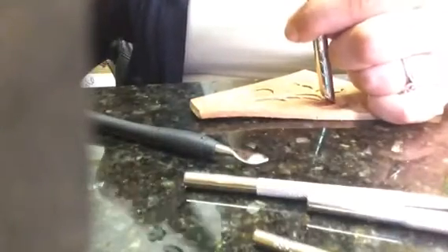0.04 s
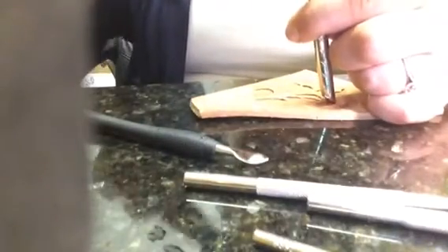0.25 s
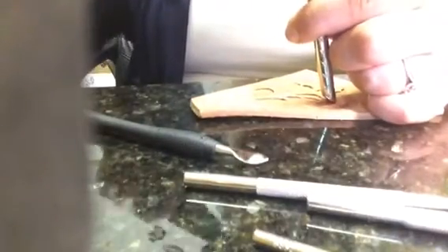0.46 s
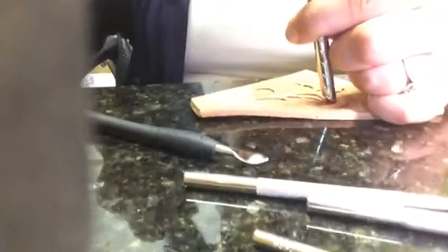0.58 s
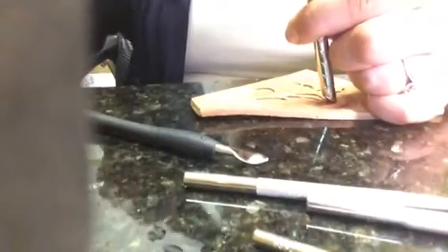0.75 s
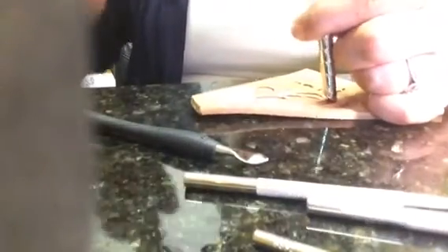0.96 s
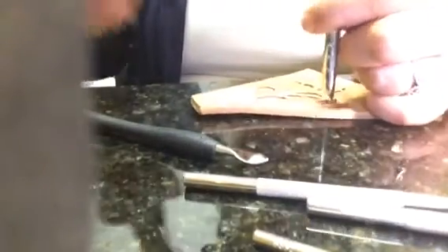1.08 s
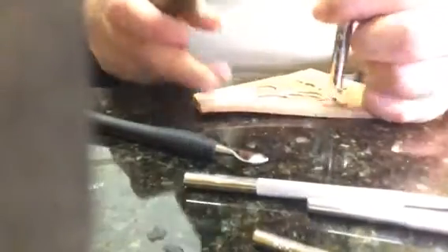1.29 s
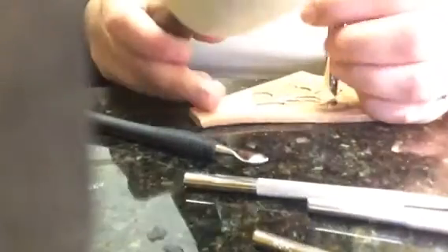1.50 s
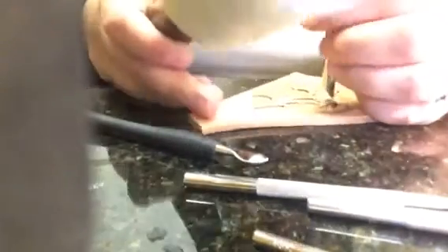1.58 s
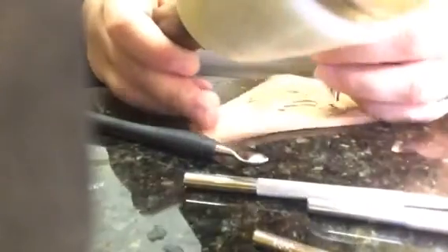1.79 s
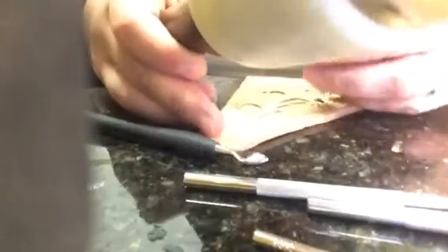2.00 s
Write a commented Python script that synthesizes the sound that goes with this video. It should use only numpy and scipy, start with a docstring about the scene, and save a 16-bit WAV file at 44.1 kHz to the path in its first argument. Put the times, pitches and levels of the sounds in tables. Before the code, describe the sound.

A mallet raps a steel stamp into damp leather on stone, four quick hard clacks, then quiet.

```python
"""A small room with a stone slab on a bench: a mallet drives a steel stamp into damp leather, four quick blows.
Each blow is a clack of ringing modes and noise, a push of air and a bench thump, with echoes and a room tail.
Loose steel tools hop on the slab and ring as damped sines each time they land.
Then fingers shift the leather, as grainy noise and thin squeaks, over a quiet hum of filtered noise.
The recorder turns itself down a little while the blows last."""
import sys
import numpy as np
from scipy import signal
from scipy.fft import rfft, irfft, next_fast_len
from scipy.io import wavfile
from scipy.ndimage import uniform_filter1d, minimum_filter1d

SR = 44100
rng = np.random.default_rng(int(sys.argv[2]) if len(sys.argv) > 2 else 0)


def decibels_to_gain(level_db):
    """Convert a level in decibels to a linear amplitude gain (20 dB per decade)."""
    exponent = np.asarray(level_db, float) / 20
    return 10 ** exponent


def materialize(psi):
    """Save the field psi as 16-bit PCM at rate SR to the path in sys.argv[1].

    A 1-D psi becomes a single channel; in a 2-D psi each row is a channel.
    """
    bounded = np.clip(np.atleast_2d(psi).T, -1, 1)
    quanta = np.round(bounded * 32767).astype(np.int16)
    wavfile.write(sys.argv[1], SR, quanta)


N = 89919  # samples in the whole scene

# mallet blows: [t/s, level/dB, thump level/dB, noise brightness/dB, second contact level/dB, tail level/dB]
BLOWS = [(0.0404, -4.5, -3.3, -2.7, -0.5, -4.27), (0.3015, -8, -0.6, -7.5, -14.5, -2.4),
         (0.5455, -7, -0.66, 2.2, 1, 0.35), (0.7778, -5.5, -2.85, 2.8, -14, -0.63)]
# ringing of the mallet head and the hand-held stamp: [f/Hz, level/dB, time to fall 60 dB/s]
CLACK_MODES = [(1573, -2.5, .011), (2235, -1, 0.008), (3240, -12, .006), (3558, -0.5, 0.0088),
               (4140, -0.5, 0.0072), (5050, -7.5, 0.0089), (6260, -14, .006), (7848, -17, 0.01),
               (12450, -34, 0.0018)]
# ringing of the bench under the slab: [f/Hz, level/dB, time to fall 60 dB/s]
BENCH_MODES = [(73, -19.5, 0.47), (121.7, -14, 0.21), (160.4, -8, .28), (203.4, -7, 0.2),
               (284.6, -19.5, 0.084), (307.7, -14.5, 0.24), (343.7, -6, 0.14), (416.4, -22.5, 0.37),
               (583.4, -23, 0.068), (721, -24, .18)]
# echoes from the walls and the bench top: [delay t/s, level/dB]
ECHOES = [(.0032, -8.5), (.0062, -8), (.0095, -20.5), (0.0131, -0.5), (0.0204, -14), (.026, -14.5)]
# how fast each frequency dies in the room, before the extra late fall: [f/Hz, time to fall 60 dB/s]
ROOM_T60 = [(100, 0.58), (400, 0.3262), (1500, 0.2951), (4000, 0.3853), (9000, 0.29), (15000, 0.3)]
# tone colour of the room tail: [f/Hz, level/dB]
ROOM_COLOUR = [(100, -3.5), (300, -1.5), (600, -10), (800, -10), (1050, -14), (1300, -10.5), (1680, -11),
               (2000, -12), (2350, -12.5), (3000, -22), (3750, -16), (4500, -25.5), (5200, -24.5),
               (6500, -29.5), (9000, -34.5), (14000, -43.5)]
# ringing of the loose tools, one entry per mode: [f/Hz]
STEEL_HZ = [7150, 7565, 9189, 9795, 10550, 12100, 13370, 13582, 15250]
# strength of those same modes: [level/dB, time to fall 60 dB/s]
STEEL_MODES = [(-21, .36), (0, .22), (-16, .12), (0, .14), (-19, .12), (-16, .1), (-7, .15), (0, .18),
               (-10, .05)]
# which tool owns each of those modes: [0 heavy, 1 middle, 2 light]
STEEL_TOOL = [0, 0, 1, 1, 1, 2, 2, 2, 2]
# landings of the loose tools: [t/s, heavy tool level/dB, middle tool level/dB, light tool level/dB]
LANDINGS = [(.057, -43.5, -62, -51.5), (0.071, -57.5, -62.5, -45), (.084, -42.5, -58, -56),
            (0.315, -56, -61, -48), (.335, -49, -66, -53.5), (.35, -34.5, -59.5, -46.5),
            (0.393, -48.5, -66.5, -66), (.566, -31.5, -51.5, -40), (0.599, -47, -47.5, -42.5),
            (0.636, -44.5, -50, -53.5), (0.794, -53.5, -41.5, -46), (0.811, -31, -32, -41),
            (.838, -41, -41, -47), (0.871, -49, -50, -53)]
# fingers and tool touch the leather: [t/s, length/s, level before colouring/dB]
RUSTLES = [(.972, .008, -56), (1.148, 0.032, -64), (1.248, 0.014, -65), (1.395, 0.0072, -67.5),
           (1.476, 0.02, -72), (1.871, 0.01, -60.5), (1.877, .045, -65)]
# tone colour of those rustles: [f/Hz, level/dB]
RUSTLE_COLOUR = [(1200, -18), (2400, -4), (4800, 0), (7500, -1), (10000, -6), (13000, -7), (15500, -9)]
# faint squeaks: [t/s, length/s, start f/Hz, rise in f/Hz, level/dB]
SQUEAKS = [(.905, 0.037, 2960, 81, -56), (1.083, 0.049, 2890, 210, -62), (1.156, .012, 2880, 30, -64.5),
           (1.87, 0.012, 2320, 12, -65.5), (1.871, 0.0089, 4950, 5.6, -64.5), (1.879, 0.021, 4380, 11, -65)]
# tone colour of the room hum, only the shape counts: [f/Hz, level/dB]
HUM_COLOUR = [(15, -34.5), (25, 14.5), (185, -7), (217, -12.5), (317, -7), (476, -19), (516, -20.5),
              (641, -21), (1160, -20), (2410, -26.5), (3430, -35.5), (3720, -34.5), (8360, -44),
              (14400, -49.5), (16000, -61)]
# narrow bands that stand out of the hum: [centre f/Hz, width f/Hz, level/dB]
HUM_BANDS = [(192, 13, -65), (290.7, 24, -69), (1230, 80, -76.5), (1672, 110, -74), (3333, 48, -83)]


def unit(x):
    """Scales a signal to rms 1."""
    return x / np.sqrt(np.mean(x ** 2) + 1e-20)


def along(points, hz):
    """Reads a (frequency, value) curve between its points, on a log frequency axis."""
    f, value = np.transpose(points)
    return np.interp(np.log(hz + 1), np.log(f + 1), value)


def filtered(x, response):
    """Multiplies the spectrum of x by a response that depends on frequency."""
    size = next_fast_len(len(x) + 8192)
    hz = np.fft.rfftfreq(size, 1 / SR)
    return irfft(rfft(x, size) * response(hz), size)[:len(x)]


def add(track, s, sound):
    """Mixes a sound into the track, starting at s seconds."""
    part = track[max(round(s * SR), 0):][:len(sound)]
    part += sound[:len(part)]


def ring(modes, t, scatter_db, flutter_db=0):
    """A struck solid rings as damped sines, each a little stronger or weaker every time."""
    hz, db, t60 = np.transpose(modes)[:, :, None]
    db = db + scatter_db * rng.standard_normal(db.shape)
    if flutter_db:
        noise = rng.standard_normal((len(hz), len(t)))
        db = db + flutter_db * unit(uniform_filter1d(noise, size=round(0.01 * SR)))  # 10 ms average
    return (decibels_to_gain(db - 60 * t / t60) * np.sin(2 * np.pi * hz * t)).sum(0)


def mallet_clack(t, bright_db, second_db):
    """Head meets stamp, then the stamp bottoms on the stone: each contact is noise plus ringing."""
    second_s, contact_s = 0.0011, 0.0008  # delay of the second contact, softness of each onset
    crack_db, crack_t60 = -6.5, 0.0069
    clack = np.zeros(len(t))
    onset = 1 - np.exp(-(t / contact_s) ** 2)
    for lag, contact_db in ((0, 0), (second_s, second_db)):
        crack = decibels_to_gain(crack_db + bright_db - 60 * t / crack_t60) * rng.standard_normal(len(t))
        ringing = ring(CLACK_MODES, t, scatter_db=1.5)
        add(clack, lag, decibels_to_gain(contact_db) * onset * (crack - ringing))
    return clack


def air_push(t, thump_db):
    """The air push of the blow: pressure swings one way, then the other, and fades."""
    push_db, push_s = 1, 0.00067
    u = t / push_s
    return decibels_to_gain(thump_db + push_db) * u ** 2 * (3 - u) * np.exp(-u)


def bench_thump(t, thump_db):
    """The bench swells up over about 10 ms and rings in low, slightly fluttering modes."""
    swell = 1 - np.exp(-t / 0.01)
    return decibels_to_gain(thump_db) * swell * ring(BENCH_MODES, t, scatter_db=2, flutter_db=1.5)


def early_echoes(direct):
    """Walls and bench top send back delayed copies, with the treble above 970 Hz softened."""
    echoes = np.zeros(len(direct))
    for lag, echo_db in ECHOES:
        add(echoes, lag, decibels_to_gain(echo_db) * direct)
    return filtered(echoes, lambda hz: 1 / (1 + 1j * hz / 970))


def room_tail():
    """The spread-out answer of room and bench top: noise whose frequencies each die at their own speed."""
    room_db, rise_s, lumps_db = 6, 0.0035, 1.5
    late_db, late_s = -4.5, 0.17  # the tail falls faster near its end
    hz, t, z = signal.stft(rng.standard_normal(SR // 2), SR, nperseg=256)
    lumps = lumps_db * unit(uniform_filter1d(rng.standard_normal(z.shape), size=12, axis=0))
    colour_db = along(ROOM_COLOUR, hz)[:, None]
    decay_db = -60 * t / along(ROOM_T60, hz)[:, None]
    shape_db = colour_db + decay_db + late_db * (t / late_s) ** 3
    tail = signal.istft(z * decibels_to_gain(shape_db + lumps), SR, nperseg=256)[1][:SR // 2]
    rise = 1 - np.exp(-(np.arange(len(tail)) / SR / rise_s) ** 2)
    return decibels_to_gain(room_db) * tail * rise


def mallet():
    """Each blow sends out clack and air push, which echo, and sets off bench and room."""
    out, t = np.zeros(N), np.arange(SR // 2) / SR
    for s, db, thump_db, bright_db, second_db, tail_db in BLOWS:
        direct = mallet_clack(t, bright_db, second_db) + air_push(t, thump_db)
        echoes = early_echoes(direct)
        bench = bench_thump(t, thump_db)
        add(out, s, decibels_to_gain(db) * (direct + echoes + bench + decibels_to_gain(tail_db) * room_tail()))
    return out


def loose_tools():
    """Every landing rings the three steel tools anew; they chatter on the stone, so the ring flutters."""
    out, t = np.zeros(N), np.arange(SR // 3) / SR
    mode_db, t60 = np.transpose(STEEL_MODES)
    onset = 1 - np.exp(-t / 0.004)
    for s, *tool_db in LANDINGS:
        modes = np.c_[STEEL_HZ, mode_db + np.take(tool_db, STEEL_TOOL), t60]
        add(out, s, onset * ring(modes, t, scatter_db=1.5, flutter_db=2.5))
    return out


def rustles():
    """Touches on the leather: noise times noise gives sparse grains, which swell and fade."""
    out = np.zeros(N)
    for s, length, db in RUSTLES:
        n = round(length * SR)
        grains = np.prod(rng.standard_normal((2, SR // 10)), 0)[:n]
        swell = np.sin(np.pi * (np.arange(n) / n) ** 0.69)
        add(out, s, decibels_to_gain(db) * grains * swell)
    return filtered(out, lambda hz: decibels_to_gain(along(RUSTLE_COLOUR, hz)))


def squeaks():
    """Thin rising tones whose pitch wavers and whose loudness is rough."""
    waver_hz, rough_db = 40, 4
    out = np.zeros(N)
    for s, length, hz, rise_hz, db in SQUEAKS:
        u = np.arange(round(length * SR)) / (length * SR)  # 0 to 1 through the squeak
        slow_noise = unit(uniform_filter1d(rng.standard_normal((2, SR // 10)), size=120))
        waver, rough = slow_noise[:, :len(u)]
        pitch = hz + rise_hz * u + waver_hz * waver
        tone = np.sin(2 * np.pi * np.cumsum(pitch) / SR)
        add(out, s, decibels_to_gain(db + rough_db * rough) * np.sin(np.pi * u) ** 0.6 * tone)
    return out


def hum():
    """Room hum: coloured noise, uneven in time and pitch, with a few narrow bands standing out."""
    hum_db, patchy_db = -50, 1.5
    z = signal.stft(rng.standard_normal(N), nperseg=512)[2]
    patches = uniform_filter1d(rng.standard_normal(z.shape), size=5, axis=0)
    patches = unit(uniform_filter1d(patches, size=8, axis=1))
    air = signal.istft(z * decibels_to_gain(patchy_db * patches), nperseg=512)[1][:N]
    out = decibels_to_gain(hum_db) * unit(filtered(air, lambda hz: decibels_to_gain(along(HUM_COLOUR, hz))))
    for centre, width, db in HUM_BANDS:
        band = filtered(rng.standard_normal(N), lambda hz: 1 / (1 + (2 * (hz - centre) / width) ** 2))
        out = out + decibels_to_gain(db) * unit(band)
    return out


def scene():
    """Everything at one microphone, as one channel."""
    return (mallet() + loose_tools() + rustles() + squeaks() + hum())[None]


def low_pass(x):
    """Removes everything above the highest recorded frequency."""
    return signal.sosfilt(signal.butter(12, 16480, fs=SR, output="sos"), x)


def record(dry):
    """Gain control turns down while the sound is loud, holds, and lets go; filters trim rumble and top."""
    duck_db, over_db, hold_s, release_s = -1.5, -30, 0.19, 0.03
    low_hz, low_steep, top_hz, top_steep = 70, 2.1, 15250, 70
    level_db = 20 * np.log10(np.abs(dry[0]) + 1e-9)
    loud = np.clip((level_db - over_db) / 6, 0, 1)  # full ducking 6 dB above the threshold
    hold, ramp = round(hold_s * SR), round(release_s * SR)
    # the shifted windows look back in time only
    held = -minimum_filter1d(-loud, size=hold, origin=(hold - 1) // 2)
    duck = np.maximum(held, uniform_filter1d(held, size=ramp, origin=(ramp - 1) // 2))

    def band(hz):
        """Lets through what lies between rumble and top."""
        top_cut = 1 / (1 + (hz / top_hz) ** top_steep)
        return top_cut / (1 + (low_hz / (hz + 1)) ** low_steep)

    mix = filtered(dry[0] * decibels_to_gain(duck_db * duck), band)[None]
    return low_pass(mix)


dry = scene()
out = record(dry)
materialize(out)
```